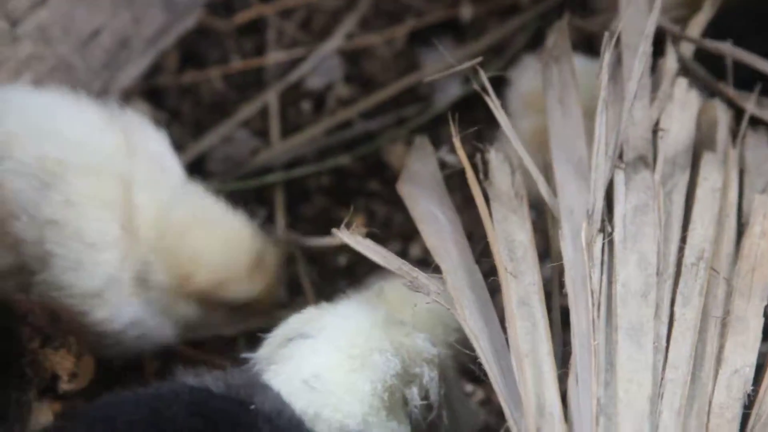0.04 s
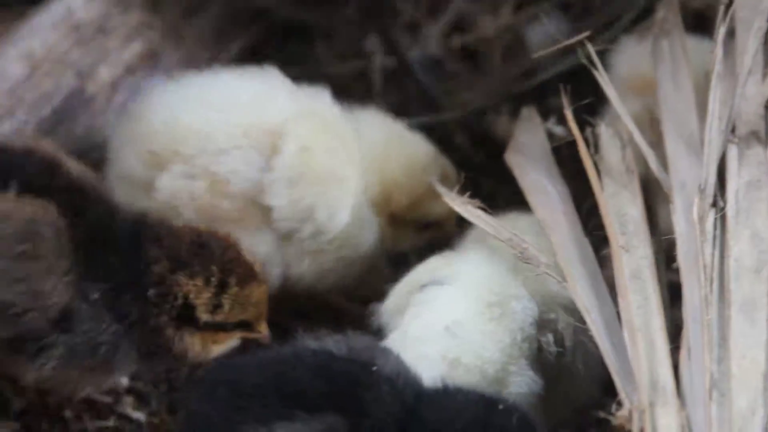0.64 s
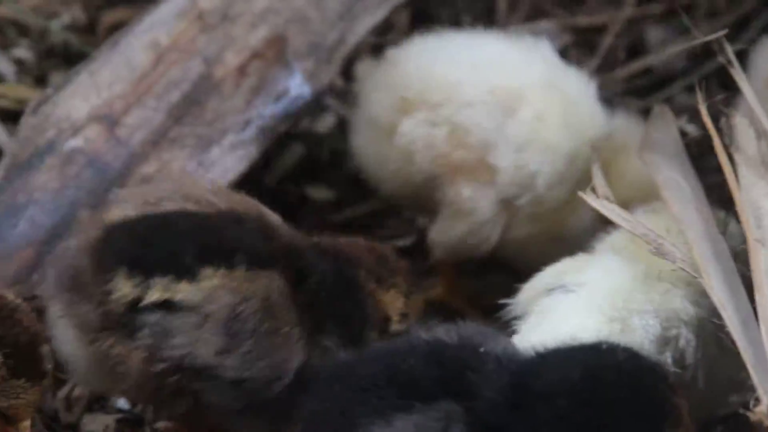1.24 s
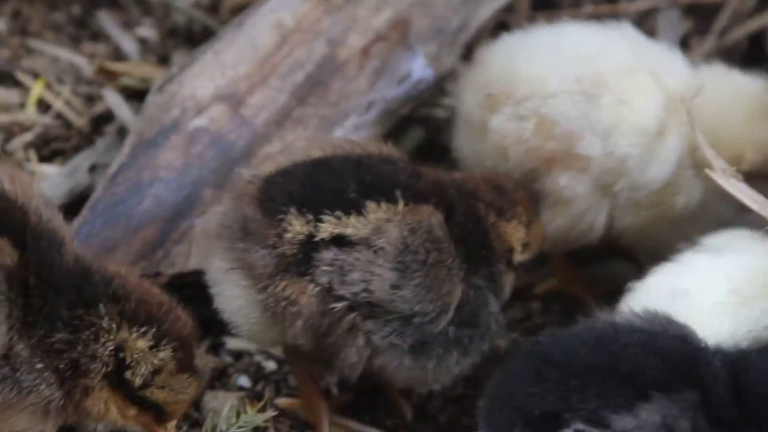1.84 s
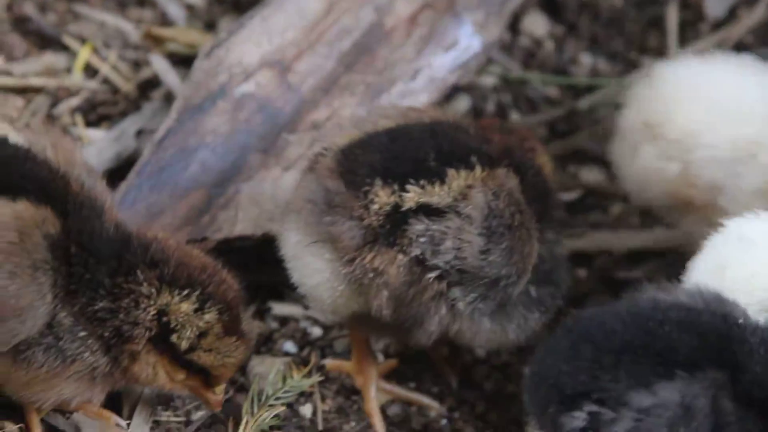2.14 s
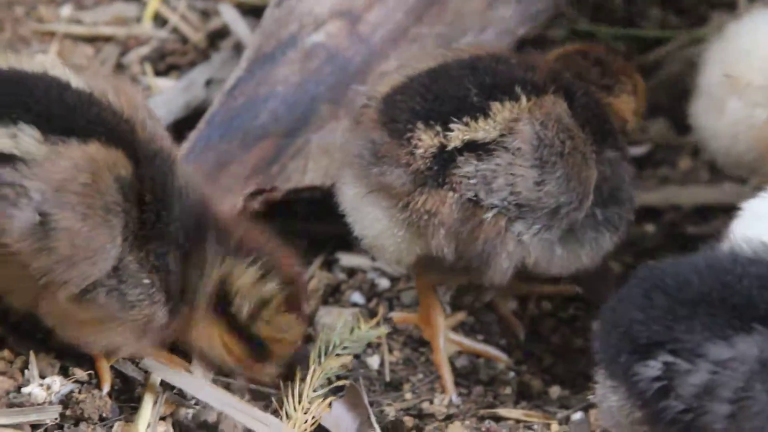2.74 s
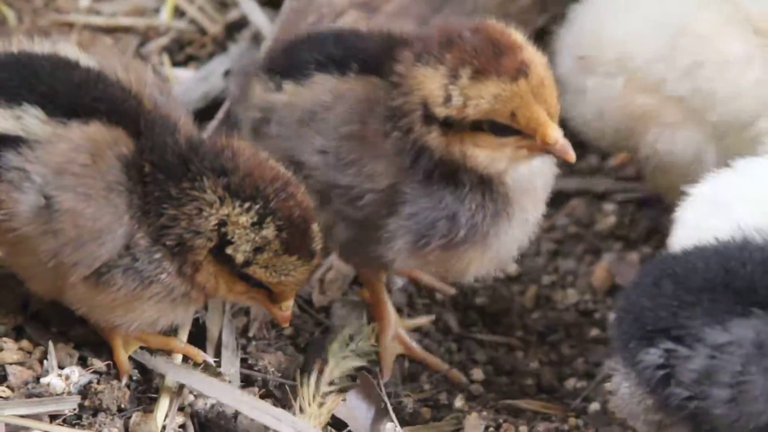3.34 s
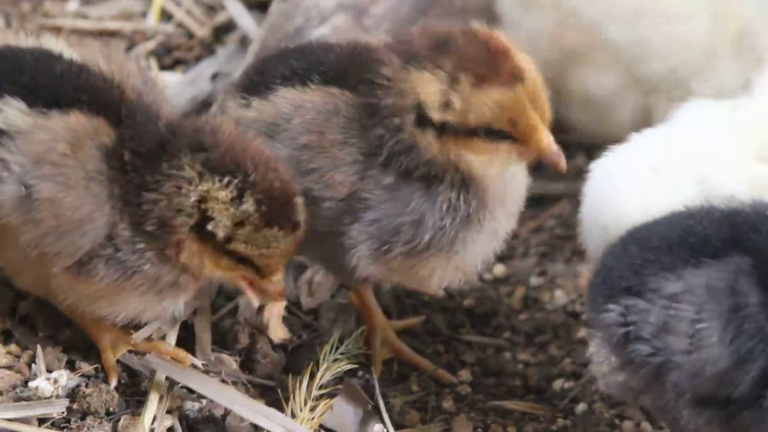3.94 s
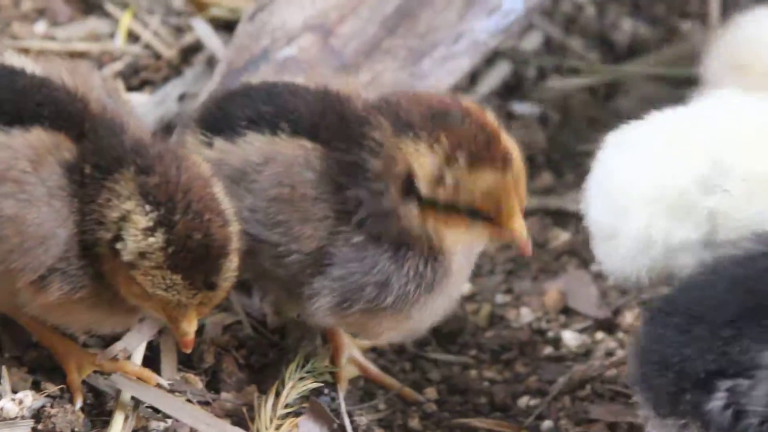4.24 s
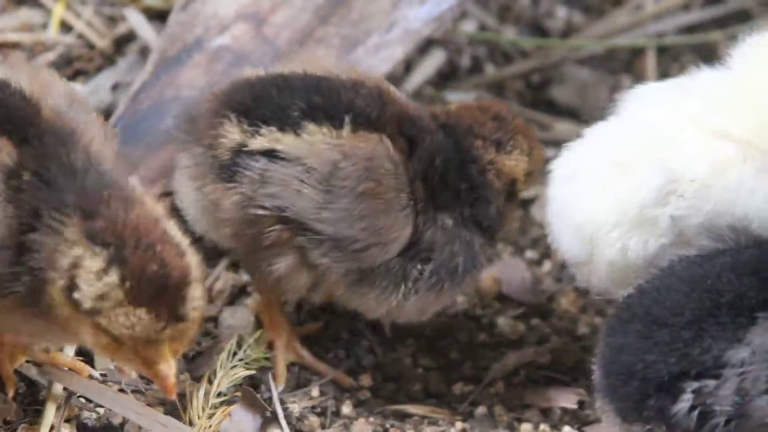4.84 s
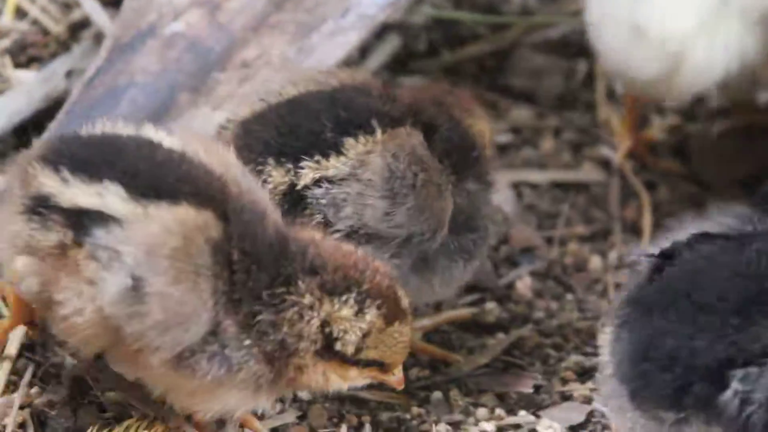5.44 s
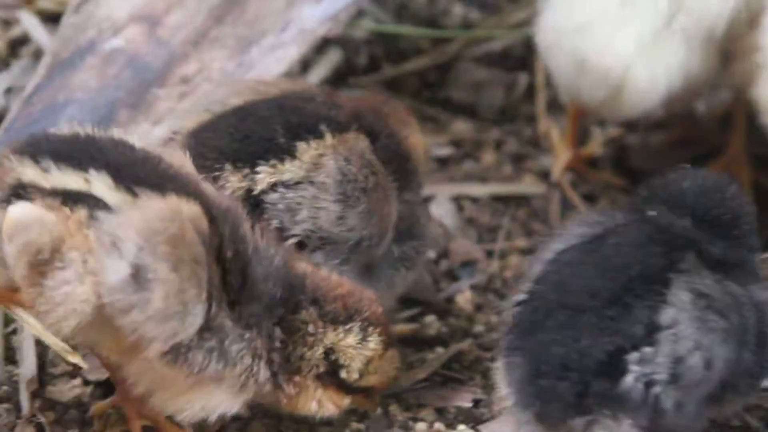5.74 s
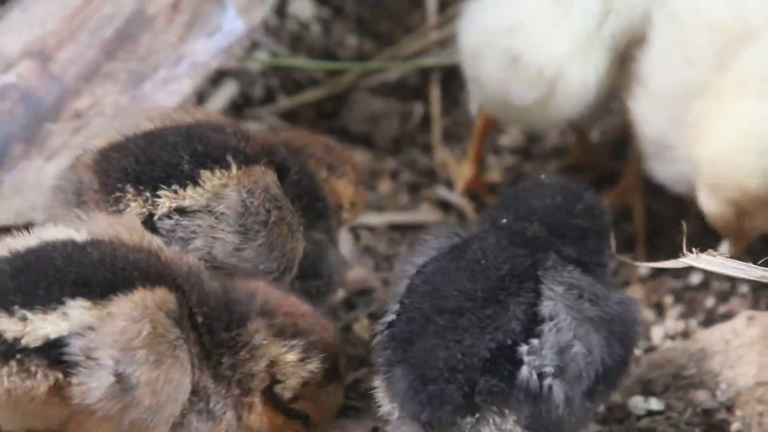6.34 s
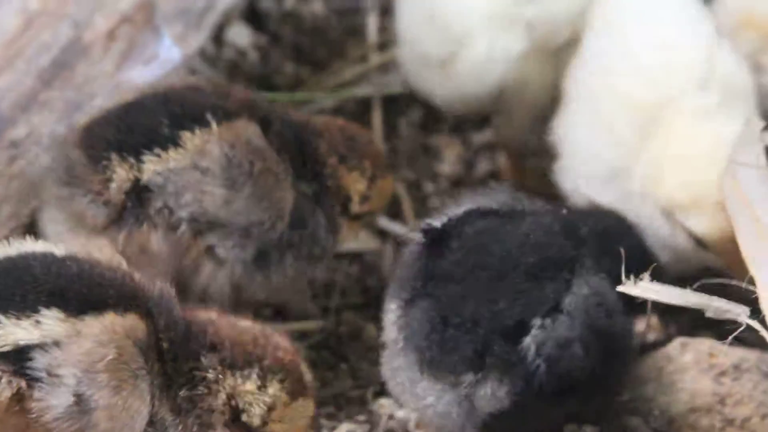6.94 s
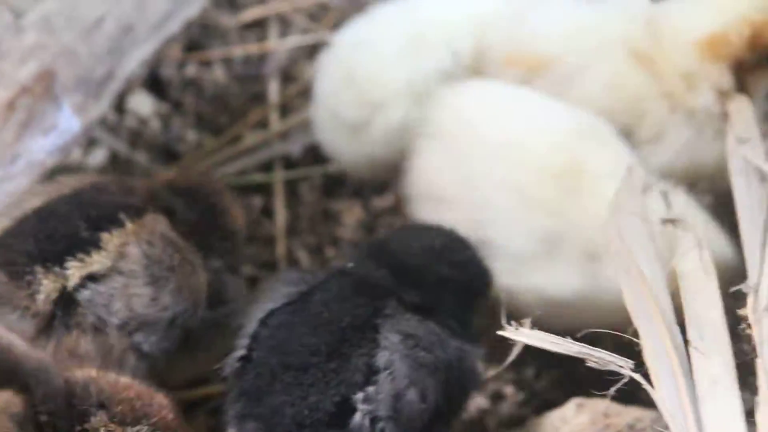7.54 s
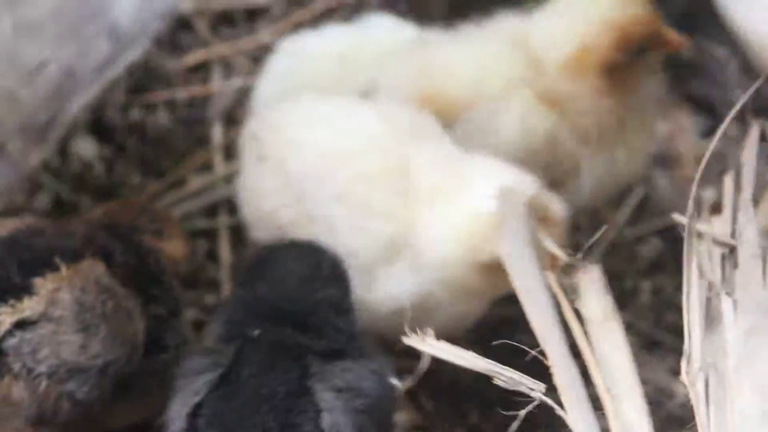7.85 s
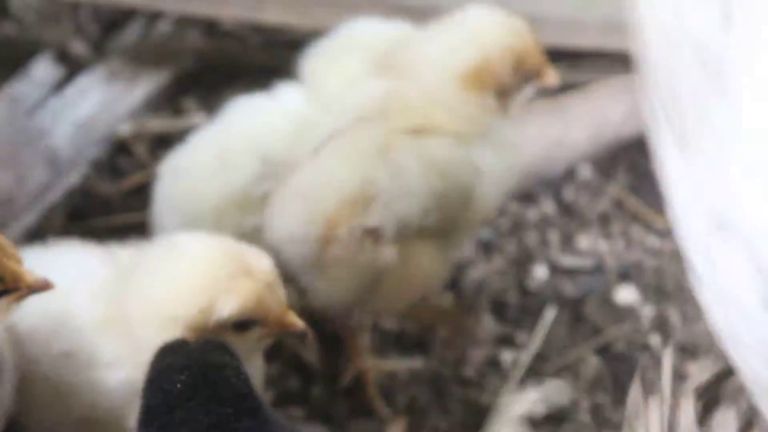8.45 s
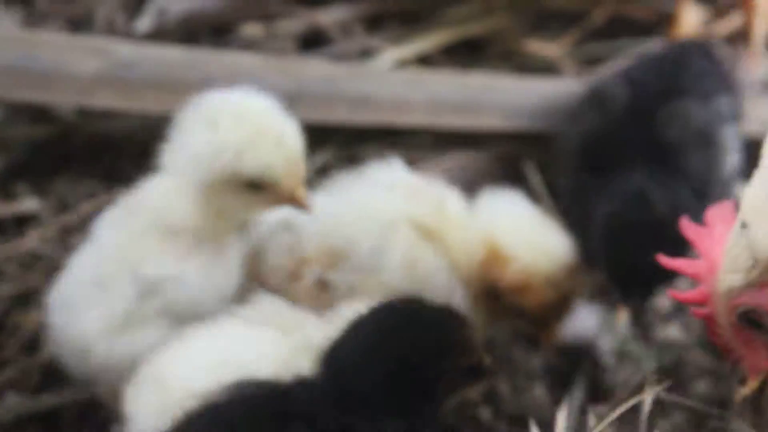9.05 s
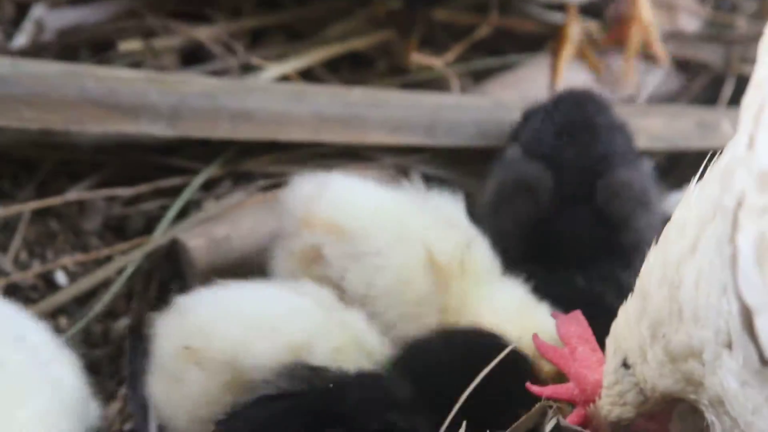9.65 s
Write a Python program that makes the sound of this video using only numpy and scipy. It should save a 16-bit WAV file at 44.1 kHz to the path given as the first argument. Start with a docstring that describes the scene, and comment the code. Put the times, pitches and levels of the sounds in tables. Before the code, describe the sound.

Several chicks peep close by throughout in a small outdoor pen, mixing high, clear falling peeps with short rising pips, several each second. Their feet scratch and crackle in dry straw over soft, steady air. A hen clucks once at about 1.5 seconds. Thin, distant whistles sound near 1.5, 2 and 5 seconds. From 3 to 3.8 seconds wings flurry, with sharp snaps of stalks, thuds and hollow knocks, loudest at about 3.7 seconds. Peeping and light scratching continue while a faint low drone swells around 6.5 seconds and recedes. Wire mesh tinks very faintly near 7.7 seconds. The peeps grow louder, and a second flurry with snaps and a knock runs from 8 to 8.5 seconds. The hen then gives a low, rattling mutter until about 8.8 seconds. A last rustle, a click and a few peeps follow, up to about 9.6 seconds.

```python
"""Chicks peep close by as they forage in dry straw, in a small outdoor pen with a hen.
Each peep is one glide of a nearly pure tone: a soft falling arch or a short rising pip.
Feet scratch the straw all along; twice wings flurry and knock against things.
The hen clucks once and later mutters, both made of pulses that ring her throat.
Behind it all are three thin, far-off whistles and the steady air of the yard."""
import sys
import numpy as np
from scipy import signal
from scipy.fft import rfft, irfft, next_fast_len
from scipy.io import wavfile

SR = 44100
rng = np.random.default_rng(int(sys.argv[2]) if len(sys.argv) > 2 else 0)


def dump(signal):
    """Clip the signal to [-1, 1] and save it as 16-bit WAV at the path in sys.argv[1]."""
    limited = np.clip(np.atleast_2d(signal).T, -1, 1)
    pcm = np.round(limited * 32767).astype(np.int16)
    wavfile.write(sys.argv[1], SR, pcm)


N = 427769
TIME = np.arange(N) / SR


def undb(db):
    """Turn decibels into a gain."""
    return 10 ** (np.asarray(db) / 20)


def unit(x):
    """Scale to an average (rms) level of 1."""
    return x / np.sqrt(np.mean(x ** 2))


def noise():
    """White noise for the whole scene."""
    return rng.standard_normal(N)


def envelope(rows):
    """A gain that follows (seconds, dB) rows, silent outside them."""
    s, db = np.transpose(rows)
    return undb(np.interp(TIME, s, db)) * (TIME >= s[0]) * (TIME <= s[-1])


def colour(x, points):
    """Shape a sound's lows and highs by (Hz, dB) rows, then scale it to level 1."""
    hz, db = np.transpose(points)
    size = next_fast_len(N)
    f = np.maximum(np.fft.rfftfreq(size, 1 / SR), 1)
    rolloff = np.minimum(f / hz[0], 1) ** 2 * np.minimum(hz[-1] / f, 1) ** 2
    gain = undb(np.interp(np.log(f), np.log(hz), db))
    return unit(irfft(rfft(x, size) * rolloff * gain, size)[:N])


def resonate(x, hz, width):
    """Favour a band of pitches around hz."""
    return signal.lfilter(*signal.iirpeak(hz, hz / min(width, SR / 3), fs=SR), x)


def drift(rate, size=N):
    """Wander to a new random value rate times a second."""
    return np.interp(np.arange(size) / SR * rate, np.arange(size), rng.standard_normal(size))


def fade(t, t60):
    """Die away by 60 dB in t60 seconds, the ring time."""
    return np.exp(-np.log(1000) * t / t60)


def ringing(modes):
    """The fading tones of a struck thing."""
    t = np.arange(SR // 2) / SR
    return sum(undb(db) * np.sin(2 * np.pi * hz * t) * fade(t, t60) for hz, db, t60 in modes)


def add(out, s, sound):
    """Mix a sound in at s seconds."""
    start = max(int(s * SR), 0)
    out[start:start + len(sound)] += sound[:N - start]


def progress(length):
    """Run from 0 to 1 over a call."""
    return np.linspace(0, 1, int(length * SR))


def bird_tone(hz, swell, waver, octave_db=-28):
    """A slightly unsteady tone; the throat favours its octave when the pitch is low."""
    phase = 2 * np.pi * np.cumsum(hz * (1 + waver * drift(400, len(hz)))) / SR
    octave = undb(octave_db) * (1 + 12 * np.exp(-((2 * hz - 4800) / 500) ** 2))
    swell = swell * undb(2.6 * drift(294, len(hz)))
    return unit(swell) * (np.sin(phase) + octave * np.sin(2 * phase)) * np.sqrt(2)


def pen_echo(x, wet_db, t60):
    """Scattered echoes off near boards thicken into a short tail."""
    t = np.arange(SR // 2) / SR
    arrivals = rng.random(len(t)) < (500 + 40000 * t) / SR
    tail = rng.standard_normal(len(t)) * arrivals * fade(t, t60) * (t > .004)
    return x + undb(wet_db) * signal.fftconvolve(x, tail / np.linalg.norm(tail))[:N]


def own_echoes(call, echo_db, latest_s, count=5):
    """Each chick stands elsewhere: its own few echoes overlap the glide and beat against it."""
    out = np.pad(call, (0, SR // 10))
    for lag in latest_s * rng.uniform(.1, 1, size=count):
        start = int(lag * SR)
        out[start:start + len(call)] += undb(echo_db) * call
    return out


# The tone of the outdoor air. Each row: frequency in Hz, strength in dB.
AIR_TONE = [(25, -2), (129, 1.5), (209, -2), (368, -3.5), (2360, -14.5), (4500, -17), (9050, -26),
            (15500, -40)]
def yard():
    """Steady outdoor air; a faint low drone swells and passes."""
    air = undb(-50.5) * colour(noise(), AIR_TONE)
    drone = unit(resonate(resonate(noise(), hz=113, width=33), hz=113, width=33))
    return air + drone * envelope([(4.5, -73), (6.4, -57.5), (9.7, -68)])


# Far whistles. Each row: start and length in seconds, pitch in Hz, relative level in dB.
WHISTLES = [(1.52, .22, 5800, -61), (1.95, .37, 2960, -42.5), (4.865, .14, 5580, -55)]
def whistles():
    """Wavering notes that swell early and trail off; the high ones are hoarse."""
    out = np.zeros(N)
    for s, length, hz, db in WHISTLES:
        u = progress(length)
        hoarseness = .012 * (hz / 3000) ** 2
        pitch = hz * (1 + 0.015 * drift(47.2, len(u)))
        swell = np.sin(np.pi * np.sqrt(u)) * np.exp(-2 * u)
        add(out, s, undb(db) * bird_tone(pitch, swell, hoarseness))
    return out


def swish(s, rise, fall, db):
    """One movement swells tenfold in the rise time, peaks at s and drops to a tenth in the fall time."""
    tenfold_drops = np.maximum((s - TIME) / rise, (TIME - s) / fall)
    return undb(db - 20 * np.minimum(tenfold_drops, 10))


# Foot strokes. Each row: peak time and fall time in seconds, relative level in dB.
FOOT_STROKES = [(0.38, 0.13, -50.5), (0.65, 0.49, -54), (1.72, 0.19, -55.5), (2.29, 0.35, -50),
                (2.82, 0.43, -49.5), (3.015, 0.12, -38.5), (3.92, 0.39, -44.5), (4.017, 0.11, -41.5),
                (4.2, 0.18, -50), (4.37, 0.61, -50), (5.0, 0.15, -52), (5.965, 0.15, -52.5),
                (6.555, 0.054, -50), (7.35, 0.85, -51.5), (7.62, 0.29, -45.5), (8.96, 0.44, -40),
                (9.16, 0.041, -39.5), (9.34, 0.05, -45)]
# Wing beats. Each row: peak time in seconds, relative level in dB.
WINGBEATS = [(3.17, -32), (3.275, -31.5), (3.44, -32.5), (3.54, -35.5), (3.626, -31), (3.78, -38),
             (8.035, -39), (8.135, -45), (8.24, -30.5), (8.31, -36.5), (8.454, -35), (8.66, -43.5)]
def stirring():
    """How hard the straw is stirred: feet, wings and constant shuffling add in power."""
    feet = sum(swish(s, 0.79 * fall, fall, db) ** 2 for s, fall, db in FOOT_STROKES)
    beats = sum(swish(s, rise=0.2, fall=0.19, db=db) ** 2 for s, db in WINGBEATS)
    shuffling = undb(-70.5) ** 2
    return np.sqrt(feet + beats + shuffling)


def crackle(rate, spread_db):
    """Tiny breaks at random moments, most weak and a few strong."""
    happens = rng.random(N) < rate / SR
    return unit(happens * noise() * undb(spread_db * np.minimum(rng.exponential(size=N), 4)))


# The tones of straw and of feathers. Each row: frequency in Hz, strength in dB.
STRAW_TONE = [(530, -5), (900, -4.5), (2450, -4.5), (2660, -1.5), (7500, -6.5), (10700, -8), (15500, -56)]
FEATHER_TONE = [(90, -24), (181, -1.5), (450, -7), (986, -6.5), (4040, 2.5), (9340, -4.5), (15500, -30)]
def rustle():
    """Straw crackles under the feet; in a hard scuffle the fuller swish of wings takes over."""
    effort = stirring()
    wing_share = effort / (effort + undb(-45))
    straw = colour(crackle(rate=2400, spread_db=2.5) * undb(4.3 * drift(60)), STRAW_TONE)
    wings = colour(crackle(rate=9000, spread_db=0.2) * undb(1.6 * drift(60)), FEATHER_TONE)
    return effort * (undb(2) * straw * (1 - wing_share) + undb(6.5) * wings * wing_share)


# Snapping stalks and pecks. Each row: start in seconds, level in dB, centre pitch in Hz.
SNAPS = [(0.046, -24.5, 6040), (0.047, -27.5, 1450), (0.518, -35.5, 4830), (3.222, -16, 4460),
         (3.393, -12.5, 6030), (3.436, -17, 6000), (3.513, -17, 3850), (3.561, -20, 8000),
         (3.749, -9, 3550), (3.752, -12, 3120), (4.257, -36, 4500), (4.354, -31, 8150), (6.541, -34, 2340),
         (8.014, -27.5, 6000), (8.033, -21.5, 5350), (8.13, -29, 9000), (8.176, -16.5, 5000),
         (8.189, -17.5, 7200), (8.246, -13.5, 8000), (9.16, -27.5, 3400)]
def snaps():
    """A sharp crack, then a brief shiver of the stalks around it."""
    out, t = np.zeros(N), np.arange(SR // 10) / SR
    for s, db, hz in SNAPS:
        burst = unit(resonate(rng.standard_normal(len(t)), hz, 0.43 * hz))
        add(out, s, undb(db) * burst * (fade(t, 0.0067) + 0.19 * fade(t, 0.15)))
    return signal.sosfilt(signal.butter(5, 10000, fs=SR, output="sos"), out)


# Bumps. Each row: start in seconds, thud level in dB, ring level in dB.
BUMPS = [(2.383, -38.5, -49), (3.224, -32.5, -65), (3.397, -26, -29), (3.514, -29, -59), (3.749, -27, -21),
         (3.911, -39.5, -37.5), (8.364, -28, -33)]
# The tone of a thud. Each row: frequency in Hz, strength in dB.
THUD_TONE = [(130, -0.5), (350, 3.5), (1000, 1), (5000, -12.5)]
# Tinks of wire mesh. Each row: start in seconds, relative level in dB.
TINKS = [(2.254, -68), (7.565, -66), (7.708, -58)]
# How a hollow thing and the wire ring. Each row: pitch in Hz, strength in dB, ring time in seconds.
HOLLOW_RING = [(194, -18, .18), (785, -1, .15)]
WIRE_RING = [(5420, 20, 0.21), (8260, 19, 0.19), (8950, 17, 0.14), (12900, 2, .15)]
def knocks():
    """Bodies and feet thud and set a hollow thing ringing; wire mesh tinks lightly."""
    thuds, rings, t = np.zeros(N), np.zeros(N), np.arange(SR // 2) / SR
    for s, thud_db, ring_db in BUMPS:
        add(thuds, s, undb(thud_db) * fade(t, 0.12))
        add(rings, s, undb(ring_db) * ringing(HOLLOW_RING))
    for s, db in TINKS:
        add(rings, s, undb(db + 2 * drift(200, len(t))) * ringing(WIRE_RING))
    return thuds * colour(noise(), THUD_TONE) + rings


# The course of one cluck. Each row: time in seconds, pulses per second, level in dB.
CLUCK = [(1.434, 186, -36), (1.453, 192.6, -34.5), (1.462, 343, -33.5), (1.496, 266.6, -45.5)]
# Bands the hen's throat favours. Each row: centre and width in Hz, strength in dB.
THROAT = [(274, 77, 0), (413, 26, 4), (610, 230, -9), (1220, 330, -12), (4900, 380, -18)]
def cluck():
    """A handful of quickening pulses ring the hen's throat."""
    s, rate, db = np.transpose(CLUCK)
    cycles = np.cumsum(np.interp(TIME, s, rate) * (TIME > s[0])) / SR
    pulses = np.diff(np.floor(cycles), prepend=0) + .01 * noise()
    voice = sum(undb(gain_db) * resonate(pulses, hz, width) for hz, width, gain_db in THROAT)
    voice = signal.sosfilt(signal.butter(6, [140, 5400], "band", fs=SR, output="sos"), voice)
    sounding = (TIME > s[0]) & (TIME < s[-1])
    return voice / np.std(voice[sounding]) * envelope(np.column_stack([s, db]))


# The hen's low rattling mutter. Each row: start and length in seconds, relative level in dB.
MUTTER = [(8.527, .02, -30.5), (8.574, .03, -27), (8.64, .05, -30), (8.707, .055, -30.5), (8.78, .045, -32)]
# Her throat's tones. Each row: pitch in Hz, strength in dB, ring time in seconds.
MUTTER_RING = [(399, -6, 0.082), (621, 0.5, 0.03), (907, 1, 0.025), (1460, -5, 0.018)]
def mutter(pulses_per_s=115.1):
    """Loose, soft, uneven pulses, each ringing the hen's throat a little differently."""
    out, t = np.zeros(N), np.arange(SR // 2) / SR
    onset = 1 - fade(t, .015)
    for s, length, db in MUTTER:
        at = s
        while at < s + length:
            gap = rng.uniform(.5, 1.5) / pulses_per_s
            accent_db = 2 * rng.standard_normal()
            detune = 1 + 0.092 * rng.standard_normal()
            throat = ringing([(hz * detune, tone_db, t60) for hz, tone_db, t60 in MUTTER_RING])
            add(out, at, undb(db + accent_db) * onset * throat)
            at += gap
    return signal.sosfilt(signal.butter(3, [280, 1800], "band", fs=SR, output="sos"), out)


# Pip shapes. Each lists: length in seconds, place and half-width of the upward flip as shares
# of that length, gain of the high part over the low, base strength of the octave in dB.
SMOOTH = (0.0368, 0.66, 0.1, 3.5, -32)
SCOOPED = (0.0536, .6, 0.12, 3.5, -30)
REEDY = (0.0356, 0.69, 0.06, 1.4, -25)
# Rising pips. Each row: time of the flip in seconds, low and high pitch in Hz, level in dB, shape.
PIPS = [(.106, 2710, 3900, -42, SCOOPED), (.199, 3160, 4140, -45.5, SMOOTH),
        (.383, 2728, 3934, -40.5, SCOOPED), (.443, 2220, 4230, -42, SCOOPED),
        (.654, 2970, 4342, -48, SMOOTH), (.886, 3140, 4316, -48, SMOOTH), (1.455, 2770, 4260, -45, SMOOTH),
        (1.706, 2814, 4210, -45.5, SMOOTH), (1.805, 2620, 3720, -54.5, SCOOPED),
        (1.902, 2660, 3790, -46, SCOOPED), (2.466, 2400, 4150, -46.5, REEDY),
        (2.706, 2650, 4120, -46, REEDY), (2.821, 2670, 3030, -48.5, REEDY),
        (2.981, 2600, 4100, -45.5, REEDY), (4.769, 2520, 3950, -45.5, SCOOPED),
        (4.984, 2760, 3860, -45.5, SMOOTH), (5.523, 2400, 3730, -50, SCOOPED),
        (5.714, 2830, 3758, -42.5, REEDY), (5.859, 2600, 3700, -41, SMOOTH),
        (6.134, 2500, 4120, -43, SMOOTH), (6.343, 3310, 4190, -41.5, SMOOTH),
        (6.525, 2450, 3620, -49, SMOOTH), (6.727, 2326, 4060, -47, SCOOPED),
        (6.768, 2457, 3810, -47, SCOOPED), (6.815, 2620, 4230, -41, SMOOTH),
        (7.165, 2566, 4170, -43.5, REEDY), (7.417, 2970, 4140, -43.5, SMOOTH),
        (9.453, 2370, 3830, -47.5, REEDY)]
def rising_pips():
    """A chick's pitch dips low, flips up and rounds off, louder near the top."""
    out = np.zeros(N)
    for s, low, high, db, (length, place, half_width, growth, octave_db) in PIPS:
        u = progress(length)
        flip = .5 + .5 * np.tanh((u - place) / half_width)
        swell = np.abs(np.sin(np.pi * u)) ** 0.63 * (1 + (growth - 1) * flip)
        droop = 1 - .05 * (u - place) + .008 * drift(120, len(u))
        hz = (low + (high - low) * flip) * droop
        call = bird_tone(hz, swell, waver=0.0098, octave_db=octave_db)
        add(out, s - place * length, undb(db) * own_echoes(call, echo_db=-15, latest_s=0.012))
    return out


# Peep shapes. Each lists: share of the call spent rising, rise and fall as shares of the
# top pitch, curve of the fall.
ARCH = (.27, .157, .294, 1.25)
DOME = (0.369, 0.146, .17, 1.49)
SLIDE = (.115, 0.116, .286, 1.27)
# Contented peeps. Each row: start and length in seconds, top pitch in Hz, level in dB, shape.
PEEPS = [(0.116, 0.06, 3840, -44, SLIDE), (0.277, 0.052, 3990, -39.5, ARCH),
         (0.976, 0.08, 3410, -46.5, DOME), (1.131, 0.076, 3550, -53, DOME), (1.708, 0.083, 3940, -45, DOME),
         (1.835, .052, 3420, -51, ARCH), (1.962, 0.043, 3810, -42.5, ARCH), (2.1, 0.056, 3930, -38.5, ARCH),
         (2.27, 0.072, 3830, -42, ARCH), (2.401, 0.057, 4234, -39, SLIDE),
         (2.516, 0.077, 4200, -37.5, ARCH), (2.607, 0.06, 3880, -39.5, ARCH),
         (2.732, 0.058, 4046, -37, ARCH), (2.875, 0.065, 4190, -41.5, SLIDE),
         (2.901, .068, 4170, -39.5, ARCH), (3.037, .05, 3790, -37.5, SLIDE), (3.047, 0.1, 4400, -35, ARCH),
         (3.488, 0.075, 4400, -33.5, ARCH), (3.655, 0.091, 4236, -39.5, DOME),
         (3.919, 0.041, 3102, -41.5, DOME), (3.968, .066, 3834, -38, ARCH),
         (4.093, 0.065, 4380, -41.5, ARCH), (4.112, 0.067, 4226, -39.5, ARCH),
         (4.329, .098, 4420, -46, ARCH), (4.362, .076, 4146, -43, ARCH), (4.528, 0.085, 4370, -42.5, SLIDE),
         (4.545, 0.1, 4810, -45.5, DOME), (4.715, .067, 4090, -45, ARCH),
         (4.808, 0.073, 3710, -49.5, SLIDE), (4.855, 0.077, 4310, -39.5, ARCH),
         (5.365, 0.087, 3965, -39, ARCH), (5.421, 0.12, 4770, -44, ARCH), (5.465, 0.072, 3985, -42, DOME),
         (5.562, 0.066, 4290, -37, SLIDE), (5.612, .106, 4406, -45, ARCH), (5.81, .067, 4144, -49, ARCH),
         (6.281, .1, 4620, -48.5, DOME), (6.365, 0.073, 4000, -41.5, ARCH), (6.917, 0.054, 3820, -41, DOME),
         (6.999, .058, 3830, -42, DOME), (7.255, .052, 4170, -46, ARCH), (7.333, 0.071, 3420, -43.5, SLIDE),
         (7.369, 0.063, 3650, -39.5, ARCH), (7.488, 0.059, 3996, -36.5, ARCH),
         (7.529, 0.063, 3050, -46, SLIDE), (7.644, 0.088, 4384, -38.5, ARCH),
         (7.667, .056, 4000, -33, SLIDE), (7.781, 0.065, 4682, -41.5, ARCH),
         (7.821, 0.052, 4290, -33.5, SLIDE), (7.932, 0.051, 5150, -38.5, SLIDE),
         (8.089, .084, 4670, -31, SLIDE), (8.272, 0.069, 4568, -30.5, SLIDE),
         (8.484, 0.078, 5000, -41, ARCH), (9.093, 0.079, 4006, -45, ARCH), (9.121, 0.07, 4080, -39, DOME),
         (9.262, 0.05, 4280, -47, DOME), (9.58, 0.054, 3780, -44, SLIDE)]
def arching_peeps():
    """A chick's pitch lifts to its top, then slides down ever faster; no two bend quite alike."""
    out = np.zeros(N)
    for s, length, top, db, (crest, lift, sag, bend) in PEEPS:
        u = progress(length)
        rise = np.maximum(1 - u / crest, 0)
        fall = np.maximum((u - crest) / (1 - crest), 0)
        hz = top * (1 - lift * rise ** 2 - sag * fall ** bend + 0.005 * drift(94.5, len(u)))
        swell = np.abs(np.sin(np.pi * u ** 0.92)) ** 0.83
        call = bird_tone(hz, swell, waver=0.012)
        add(out, s, undb(db) * own_echoes(call, echo_db=-20.5, latest_s=.034, count=8))
    return out


def scene():
    """Near chicks, straw and hen, farther whistles, and the yard behind."""
    chicks = pen_echo(arching_peeps() + rising_pips(), wet_db=-10, t60=0.14)
    far = pen_echo(undb(-3) * whistles(), wet_db=-3, t60=0.31)
    bustle = rustle() + snaps() + knocks() + cluck() + undb(-1.5) * mutter()
    return (chicks + far + pen_echo(bustle, wet_db=-12.5, t60=0.19) + yard())[None]


def record(dry):
    """Cut the treble above 15400 Hz."""
    return signal.sosfilt(signal.ellip(8, .2, 70, 15400, fs=SR, output="sos"), dry)


dry = scene()
out = record(dry)
dump(out)
```